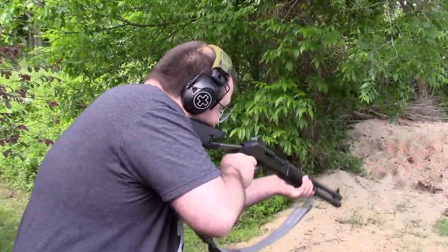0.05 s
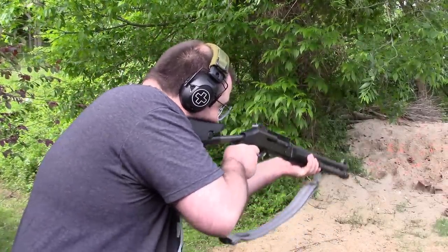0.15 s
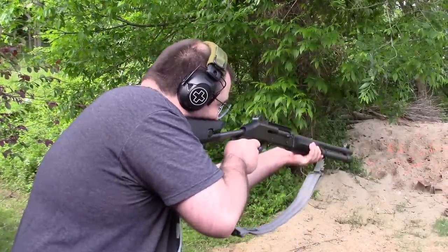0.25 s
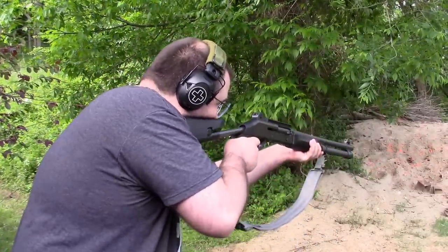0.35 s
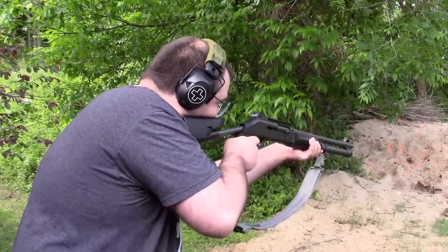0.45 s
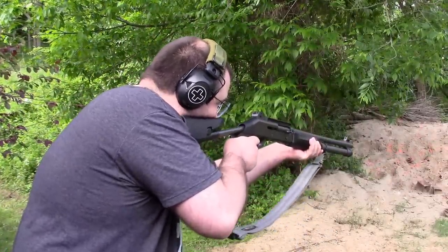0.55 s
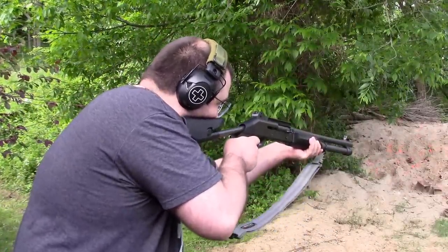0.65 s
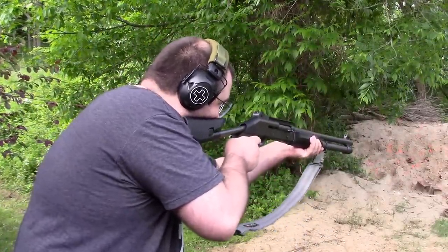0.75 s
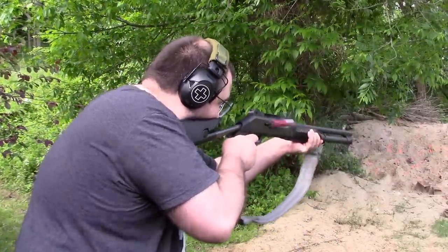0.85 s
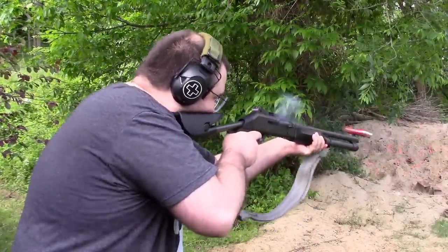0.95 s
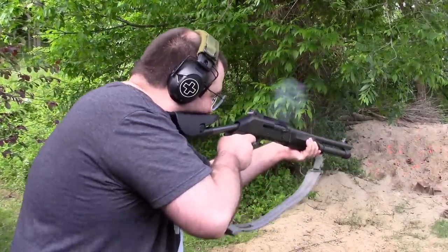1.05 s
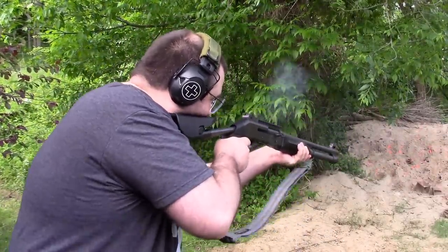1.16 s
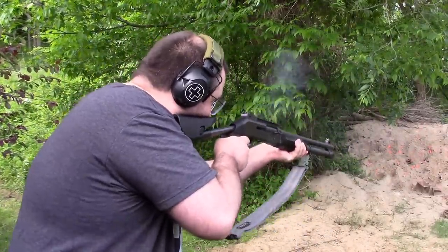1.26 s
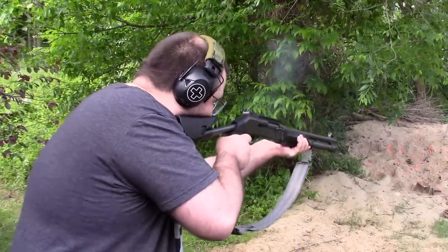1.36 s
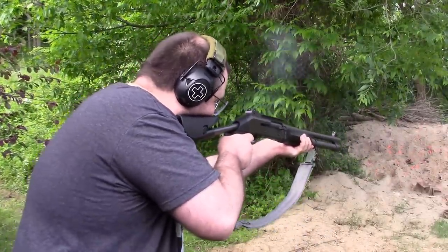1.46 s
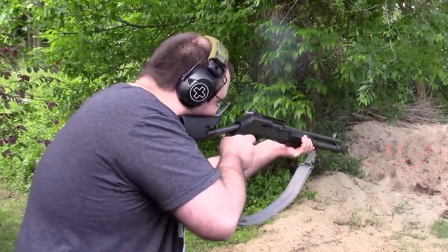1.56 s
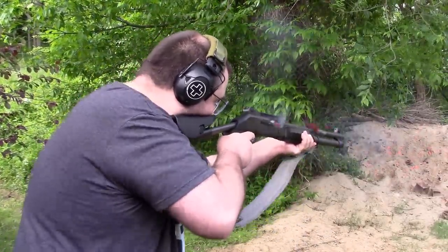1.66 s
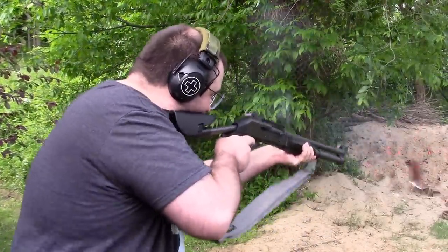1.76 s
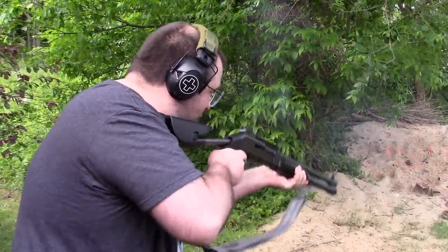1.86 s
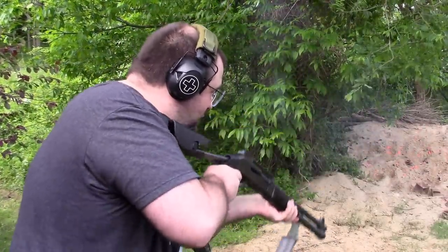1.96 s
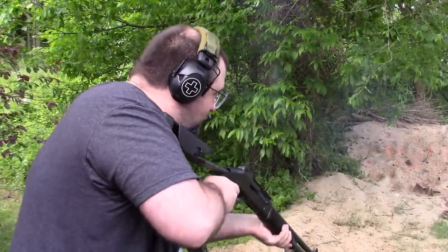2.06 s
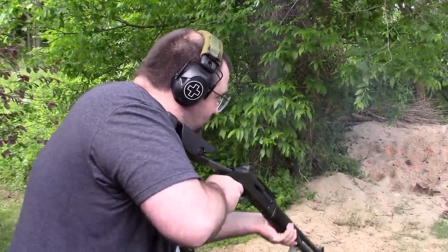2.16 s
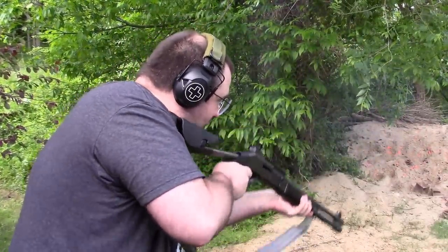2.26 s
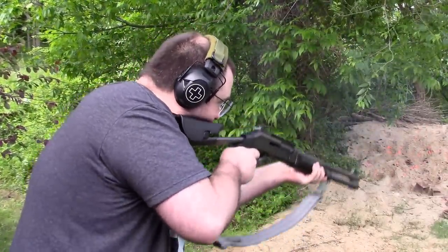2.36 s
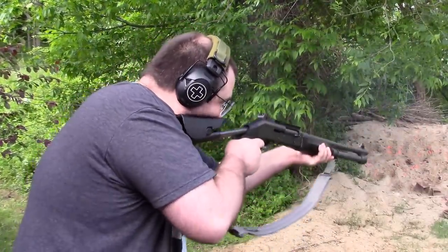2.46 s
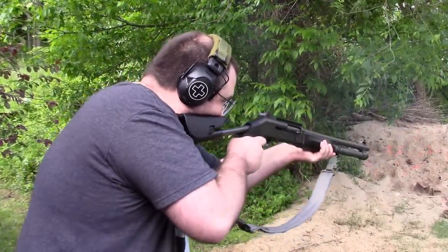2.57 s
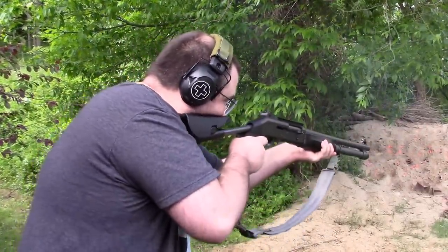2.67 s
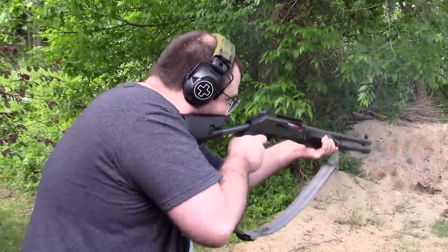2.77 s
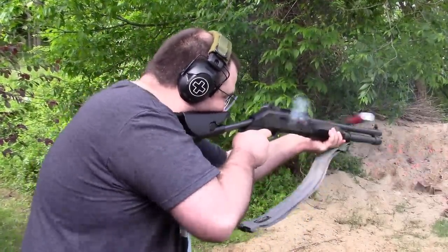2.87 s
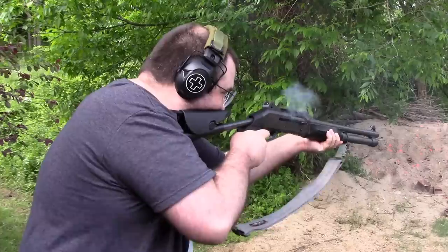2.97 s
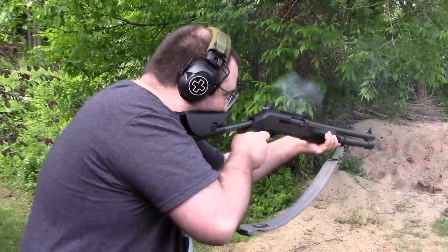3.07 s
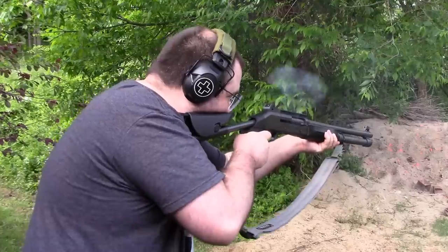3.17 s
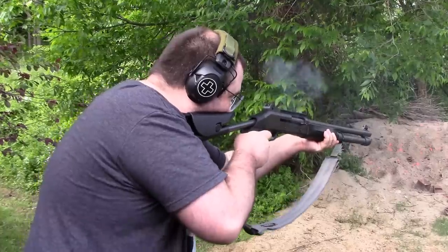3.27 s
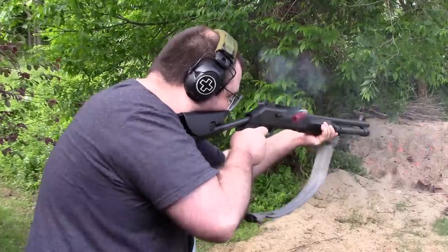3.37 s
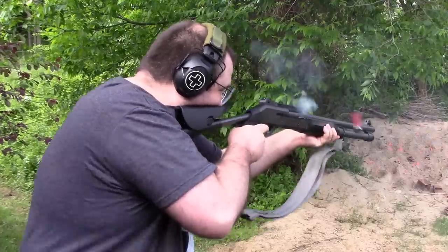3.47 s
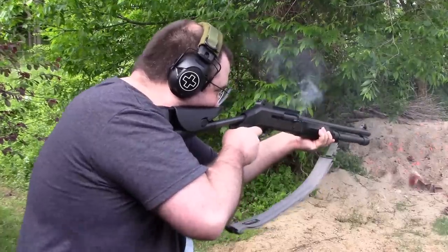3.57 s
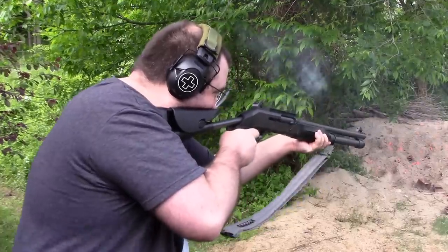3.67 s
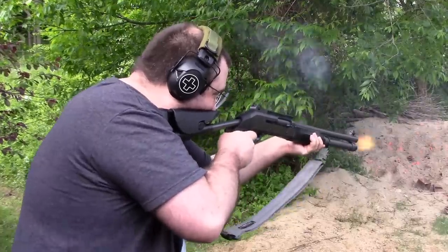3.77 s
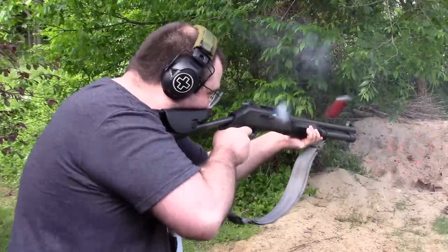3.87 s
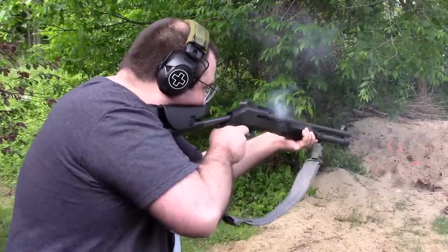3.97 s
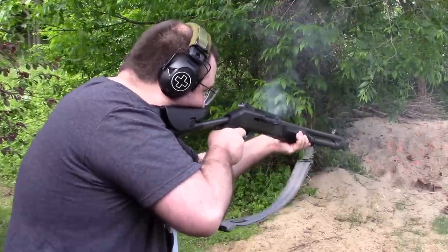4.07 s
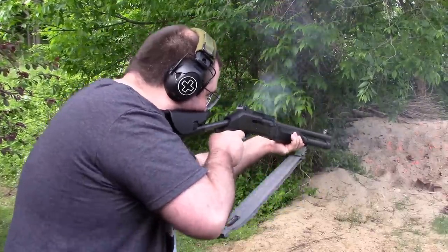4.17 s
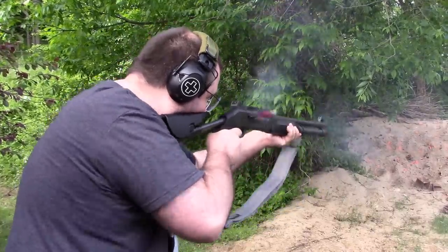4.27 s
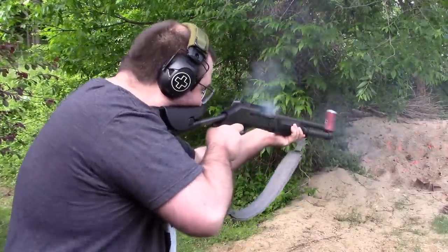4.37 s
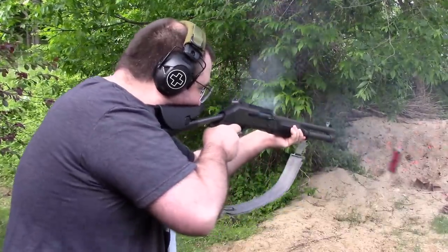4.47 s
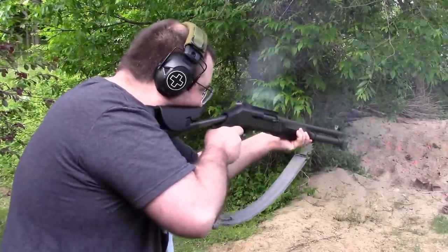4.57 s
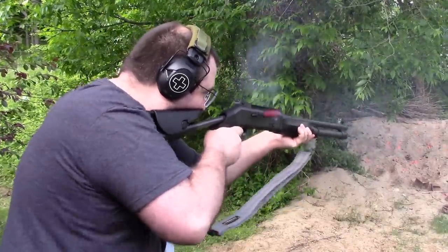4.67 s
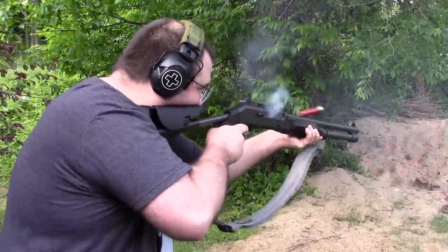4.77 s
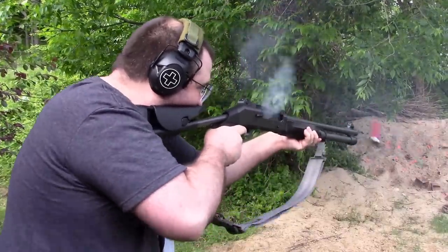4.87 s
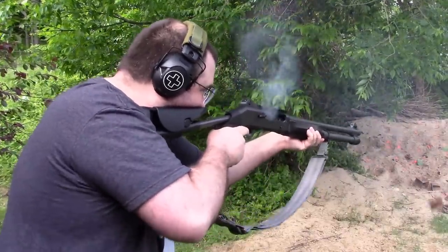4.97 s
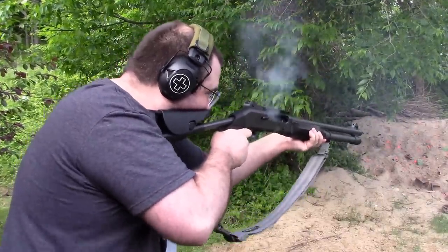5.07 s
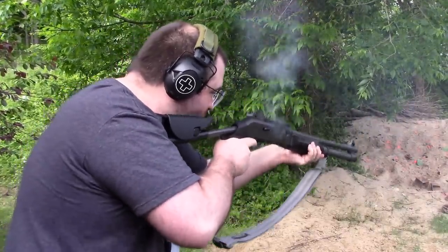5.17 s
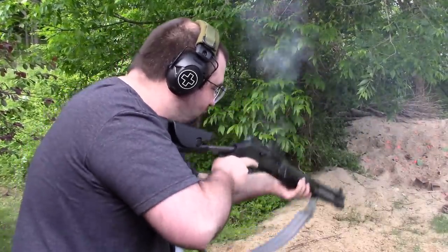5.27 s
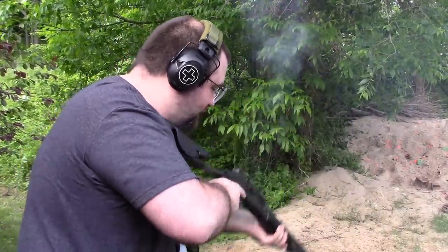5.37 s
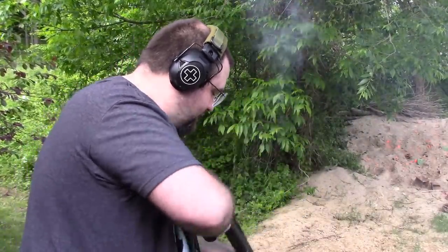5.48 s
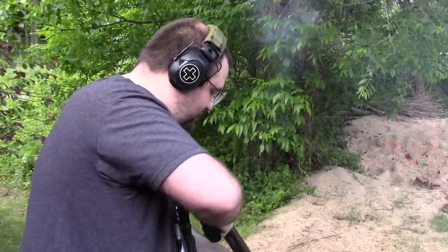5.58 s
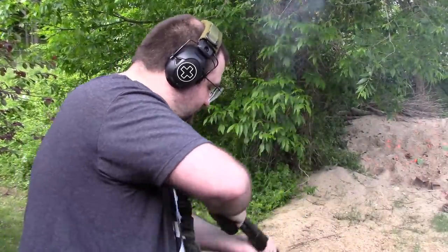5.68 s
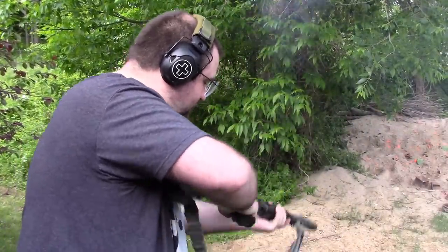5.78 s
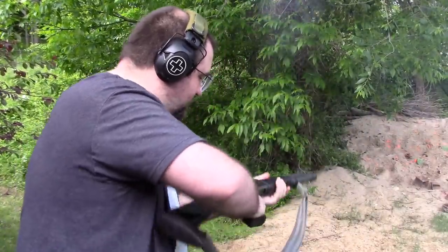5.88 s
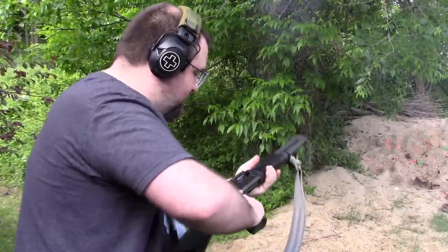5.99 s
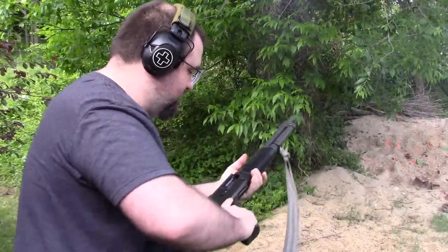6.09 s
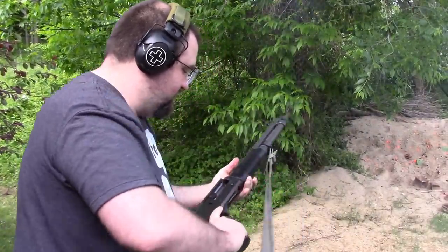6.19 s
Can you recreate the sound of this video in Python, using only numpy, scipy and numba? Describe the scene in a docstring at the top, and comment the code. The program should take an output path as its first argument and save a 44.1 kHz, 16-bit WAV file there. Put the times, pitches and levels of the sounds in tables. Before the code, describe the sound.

Cloth rustles faintly at the start, over a soft rush of outdoor air and the quiet hum of a far engine. A close semi-automatic shotgun fires at about 0.9 and 1.6 seconds, each shot a loud crack with a low boom. Five quicker shots follow at about 2.8, 3.4, 3.8, 4.3 and 4.7 seconds, a little quieter and increasingly thin in the bass. Bushes and trees return nearly the same echo each time, swelling as the volume ducks and creeps back. The steel bolt clacks shut just after every shot except the last. Empty plastic shells land with short ringing ticks, clearest at about 2.2 and 3.3 seconds, and more faintly around 5.4 seconds. Thrown-up sand patters softly after the blasts. The last echo rolls away through the far woods by about 6 seconds.

```python
"""Cloth rustles faintly over the hum of a far engine. Then a semi-automatic shotgun fires seven times
at an outdoor range: two single shots, then five in a quick string. Ground, bushes and trees send back
nearly the same echoes each time. The bolt slams shut, empty shells land and thrown-up sand sifts down.
An automatic volume control ducks at every shot and creeps back; the bass thins out in the quick string."""
import sys
import numpy as np
from scipy import signal
from scipy.fft import rfft, irfft, next_fast_len
from scipy.io import wavfile
from scipy.ndimage import uniform_filter1d, minimum_filter1d
from numba import njit

SR = 44100
rng = np.random.default_rng(int(sys.argv[2]) if len(sys.argv) > 2 else 0)


def unload_wav(signal):
    """Save mono or channel-first audio to the path in sys.argv[1] as 16-bit WAV at rate SR, clipped to [-1, 1]."""
    wavfile.write(
        sys.argv[1],
        SR,
        np.round(np.clip(np.atleast_2d(signal).T, -1, 1) * 32767).astype(np.int16),
    )


N = 274743
TAIL = 76800  # samples in one shot with its echoes
TIME = np.arange(N) / SR  # seconds since the scene began
AGE = TIME[:TAIL]  # seconds since one sound began

# The shots. Each row: start in seconds, level in dB, extra level for the crack in dB.
SHOTS = [(.867, 2, -4.5), (1.640, 1.5, -3.5), (2.817, -4, -3), (3.377, -5, 2.5), (3.838, -3.5, 1.5),
         (4.282, -7, 0), (4.705, -0.5, -1)]
# The bolt closing; after the last shot it stays open. Each row: start in seconds, level in dB.
BOLTS = [(0.9908, 3.5), (1.758, 2.5), (2.9448, -2), (3.504, -2), (3.962, 0), (4.4002, -6.5)]
# Empty shells landing. Each row: start in seconds, level in dB, fade in seconds, brightest pitch in Hz.
LANDINGS = [(1.312, -21, 0.018, 6000), (2.2348, 9.5, 0.0018, 2620), (3.333, 11, 0.0016, 6440),
            (4.242, -23, .002, 9000), (5.38, -18.5, 0.0016, 9970), (5.422, -23, 0.003, 6100)]
# The notes an empty shell rings with. Each row: pitch in Hz, width in Hz, level in dB.
SHELL_NOTES = [(1260, 110, 12), (2450, 550, 5), (2900, 450, 3), (4200, 600, 6.5), (5940, 550, -1),
               (6570, 550, -1), (9200, 2200, -12), (13500, 1500, -18)]
# Echoes off banks and trunks. Each row: delay in seconds, pitch in Hz, width in Hz, level in dB.
ECHOES = [(.198, 714, 600, 1), (.3705, 900, 666, 8), (.371, 160, 121, -4), (.3976, 880, 415, 2.5),
          (.5396, 578, 260, -4), (.424, 465, 140, 2), (.4397, 464, 202, -2), (.456, 420, 220, -5)]
# Low swells from a stand of trees and a far ridge.
# Each row: delay in seconds, half length in seconds, pitch in Hz, level in dB.
SWELLS = [(0.222, 0.041, 390, -5), (0.937, .11, 690, -35.5)]
# Leaves and air soak up sound, treble most. Each row: frequency in Hz, loss in dB per second.
ABSORPTION = [(100, 23), (400, 3), (1200, 10), (2500, 18), (5000, 45), (9000, 82.5), (16000, 148)]
# Cloth rubbing. Each row: time of full strength in seconds, hold in seconds, level in dB.
RUBS = [(0.048, .22, -55), (0.802, .07, -61.5)]
# The engine's speed. Each row: time in seconds, firings per second.
ENGINE_SPEED = [(0, 84), (.35, 91), (.6, 90.5), (6.23, 89)]
# The engine's tones. Each row: multiple of the firing rate, level in dB.
ENGINE_TONES = [(1, -54.5), (2, -59), (3, -61.5), (4, -68), (5, -62.5), (6, -67)]

# The tone colour of each noise. Each row: frequency in Hz, relative level in dB.
BLAST_COLOUR = [(40, -22), (75, -28), (105, -7.5), (200, -2), (300, 0.5), (420, 1.5), (600, 0), (760, -.5),
                (1150, 1), (1650, -4), (2500, -3), (5000, -4.5), (9000, -6.5), (16000, -21)]
CRACK_COLOUR = [(100, -22), (500, -7), (2000, -2), (4500, 0), (9000, -1), (12000, -9), (16000, -13)]
BOOM_COLOUR = [(30, -53), (80, -14.5), (170, -13.5), (290, 3.5), (520, 0.5), (800, -4.5), (1500, -10.5),
               (4000, -22.5), (16000, -67)]
ROLL_COLOUR = [(40, -66), (100, -4), (220, -6.5), (430, 2), (800, -6.5), (1250, -6), (1800, -16.5),
               (3500, -22.5), (8000, -39)]
STEEL_COLOUR = [(300, -6.5), (1500, 2), (3800, 5), (6000, 8), (9000, 6.5), (12000, -0.5), (16000, -13)]
SAND_COLOUR = [(500, 2), (2000, 8.5), (4000, 1), (6500, 5), (10000, 1.5), (12500, -6.5), (16000, -24)]
CLOTH_COLOUR = [(200, -8), (700, 3.5), (1500, -4), (2600, -1.5), (4500, -14.5), (9000, -17), (15000, -30)]
AIR_COLOUR = [(15, -63), (25, -33), (57, -16), (90, -23.5), (131, -2), (172, -2), (309, -1.5), (438, -7),
              (588, -9), (729, -9.5), (15000, -39)]
# Stereo width; the open air is wider than the gun. "Mid" is what both channels share, "side" the rest.
# Each row: frequency in Hz, side level compared with mid in dB.
GUN_WIDTH = [(100, -73), (300, -35), (1000, -20.5), (4000, -13.5), (12000, -12.5)]
AIR_WIDTH = [(100, -22), (500, -9), (2000, -10), (10000, -9)]
# The wind filter's climb. Each row: time in seconds, frequency in Hz below which sound is cut.
LOW_CUT = [(2.8, 25), (3.15, 131), (4.33, 165), (4.75, 1290)]


def blast(reflections, crack_db):
    """One shot: a crack and a boom, then the answers from near and far."""
    whole = crack(crack_db) + boom(reflections) + far_woods(reflections)
    whole = whole + foliage(reflections) + tree_swells(reflections)
    fade_out = np.minimum((AGE[-1] - AGE) / .31, 1)
    return whole * fade_out


def crack(db):
    """The muzzle gives a few milliseconds of bright noise."""
    shape = burst(start=0, hold=.0058, fade=.0019)
    return undb(db + 14) * shape * colour(noise(TAIL, side_db=-9), CRACK_COLOUR)


def boom(reflections):
    """The low body of the blast, off the ground; at first it pushes unequally on the two microphones."""
    gust = undb(-5) * burst(start=0, hold=0, fade=.016) * rng.standard_normal(TAIL)
    uneven = gust * np.array([[1], [-1]])
    rise = np.clip((AGE - .002) / .005, 0, 1)
    shape = rise * burst(start=0, hold=.018, fade=.048)
    return undb(5) * shape * colour(reflections[:, ::-1] + uneven, BOOM_COLOUR)


def foliage(reflections):
    """Countless tiny echoes, duller the later they come: the ground answers at once, bushes build up."""
    spectrum = rfft(colour(reflections, BLAST_COLOUR))
    centres_hz = np.geomspace(125, 16000, 12)
    band_position = np.interp(np.log(bins(reflections) + 1), np.log(centres_hz), np.arange(12))
    scatter = 0
    for k, hz in enumerate(centres_hz):
        band = irfft(spectrum * np.maximum(1 - abs(band_position - k), 0), TAIL)
        scatter = scatter + band * undb(-at_pitch(ABSORPTION, hz) * AGE)
    ground = undb(1.5) * swell(AGE, full=0, hold=.022, rise=0, fall=333)
    bushes = undb(1.58) * swell(AGE, full=.12, hold=.21, rise=57, fall=52)
    return scatter * np.hypot(ground, bushes)


def clumps(per_second, spread_db):
    """Bushes stand in clumps, so their echoes come in uneven bunches."""
    times = np.arange(0, AGE[-1] + 1, 1 / per_second)
    gain = undb(spread_db * np.interp(AGE, times, rng.standard_normal(len(times))))
    return gain / rms(gain)


def hard_echoes():
    """Each bank or trunk sends back a short thud, a little from one side."""
    out = np.zeros((2, TAIL))
    for delay, hz, width_hz, db in ECHOES:
        since = np.maximum(AGE - delay, 0)
        growth = np.minimum(np.pi * width_hz * since, 60)
        thud = growth * np.exp(1 - growth) * np.sin(2 * np.pi * hz * since)
        pan = 1 + .032 * rng.standard_normal() * np.array([[1], [-1]])
        out += pan * undb(db) * thud
    return signal.sosfilt(signal.butter(2, 100, "high", fs=SR, output="sos"), out)


def tree_swells(reflections):
    """A stand of trees and a far ridge return the low part of the blast, smeared by their depth."""
    out = 0
    for delay, half_length, hz, db in SWELLS:
        body = resonance(resonance(reflections, hz, width_hz=hz), hz, width_hz=hz)[:, ::-1]
        hump = np.exp(-((AGE - delay) / half_length) ** 2)
        out = out + undb(db) * hump * body / np.std(body)
    return out


def far_woods(reflections):
    """Far woods send back a roll that swells late and dies slowly."""
    shape = swell(AGE, full=.52, hold=.5, rise=48, fall=8)
    return undb(-34.5) * shape * colour(reflections[:, ::-1], ROLL_COLOUR)


def hammer():
    """The hammer snaps forward and the gun's steel parts rattle just before the blast."""
    snap = burst(start=0, hold=.001, fade=.001)
    rattle = undb(-1) * burst(start=0, hold=.006, fade=.002)
    return undb(-17) * (snap + rattle) * colour(noise(TAIL, side_db=-9), STEEL_COLOUR)


def bolt():
    """The bolt slams shut on the next shell and locks, in two clacks; the steel rings briefly."""
    slam = burst(start=0, hold=.001, fade=.0018)
    lock = undb(-3) * burst(start=.006, hold=.002, fade=.006)
    ring = undb(-17.5) * burst(start=0, hold=0, fade=.034) * np.sin(2 * np.pi * 8800 * AGE)
    return (slam + lock) * colour(noise(TAIL, side_db=-9), STEEL_COLOUR) + ring


def empty_shell(fade, bright_hz):
    """A plastic shell with a metal end ticks and rings as it lands; the bushes answer faintly."""
    tick = burst(start=0, hold=.00032, fade=fade)
    answer = undb(-29) * burst(start=.008, hold=.018, fade=.02)
    contact = resonance(noise(TAIL) * (tick + answer), bright_hz, width_hz=.87 * bright_hz)
    ring = sum(undb(db) * resonance(contact, hz, width_hz) for hz, width_hz, db in SHELL_NOTES)
    return ring + undb(-22) * contact


def sand():
    """Every shot throws up sand and leaf bits that patter down; the showers overlap."""
    showers = [swell(TIME - s, full=.24, hold=.78, rise=60, fall=12) * (TIME > s) for s, *_ in SHOTS]
    grains = undb(2.4 * rng.exponential(size=N))
    patter = colour(noise(N) * grains / rms(grains), SAND_COLOUR)
    return undb(-45.5) * np.linalg.norm(showers, axis=0) * patter


def cloth():
    """Shirt and sling rub as the gun is raised and then pulled in."""
    rubbing = sum(undb(db) * swell(TIME, full, hold, rise=60, fall=67) for full, hold, db in RUBS)
    return rubbing * colour(noise(N), CLOTH_COLOUR)


def engine():
    """A far engine hums at its firing rate and at multiples of it."""
    firings = np.cumsum(curve(ENGINE_SPEED, TIME)) / SR
    return sum(np.sqrt(2) * undb(db) * np.sin(2 * np.pi * (multiple * firings + rng.random()))
               for multiple, db in ENGINE_TONES)


def air():
    """Still air makes a soft, wide, low rush."""
    return undb(-54) * colour(noise(N, AIR_WIDTH), AIR_COLOUR)


def undb(db):
    """Turn decibels into a number to multiply by."""
    return 10 ** (np.asarray(db) / 20)


def rms(x):
    """The average strength of a signal."""
    return np.sqrt(np.mean(x ** 2))


def curve(table, t):
    """Join a table's points with straight lines in time."""
    return np.interp(t, *np.transpose(table))


def at_pitch(table, hz):
    """Read a table by frequency, giving each octave equal room."""
    table_hz, value = np.transpose(table)
    return np.interp(np.log(np.maximum(hz, 1)), np.log(table_hz), value)


def bins(x):
    """The frequencies in the spectrum of x, in Hz."""
    return np.fft.rfftfreq(x.shape[-1], 1 / SR)


def colour(x, table):
    """Give white noise a tone colour and keep its power."""
    gain = undb(at_pitch(table, bins(x)))
    return irfft(rfft(x) * gain / rms(gain), x.shape[-1])


def noise(size, width=GUN_WIDTH, side_db=0):
    """White noise as two close microphones get it: almost the same in both."""
    length = next_fast_len(size, True)
    mid, side = rng.standard_normal((2, length))
    side = irfft(rfft(side) * undb(at_pitch(width, bins(side)) + side_db), length)
    return np.array([mid + side, mid - side])[:, :size]


def burst(start, hold, fade):
    """A level that jumps up, holds and dies away; all times are in seconds."""
    return (AGE >= start) * np.exp(-np.clip((AGE - start - hold) / fade, 0, 60))


def swell(t, full, hold, rise, fall):
    """A level that rises, holds and falls; full and hold are in seconds, rise and fall in dB per second."""
    return undb(-rise * np.maximum(full - t, 0) - fall * np.maximum(t - full - hold, 0))


def resonance(x, hz, width_hz):
    """Let through a band around one pitch."""
    return signal.lfilter(*signal.iirpeak(hz, hz / min(width_hz, SR / 3), fs=SR), x)


def add(out, sound, start):
    """Mix a sound in at a start time in seconds."""
    i = int(start * SR)
    out[:, i:i + sound.shape[-1]] += sound[..., :N - i]


@njit
def low_cut(x, hz):
    """Gently remove what lies below a moving frequency."""
    y, low = np.empty(len(x)), 0.
    for i in range(len(x)):
        g = np.tan(np.pi * hz[i] / SR)
        step = (x[i] - low) * g / (1 + g)
        y[i] = x[i] - low - step
        low += 2 * step
    return y


@njit
def follow(x, release_s):
    """Follow the peaks: jump up at once, fall back gradually."""
    y, peak, keep = np.empty(len(x)), 0., np.exp(-1 / (release_s * SR))
    for i in range(len(x)):
        peak = max(x[i], peak * keep)
        y[i] = peak
    return y


def wind_filter(x):
    """A moving bass cut; the higher it climbs, the more the remaining bass moves to the centre."""
    cut_hz = curve(LOW_CUT, TIME)
    mid = low_cut((x[0] + x[1]) / 2, cut_hz)
    side = low_cut((x[0] - x[1]) / 2, cut_hz)
    side = low_cut(low_cut(side, 2.3 * cut_hz), 2.3 * cut_hz)
    return signal.sosfilt(signal.butter(3, 50, "high", fs=SR, output="sos"), [mid + side, mid - side])


def volume_control(x, top_db, release_s):
    """A blast pulls the volume down; it creeps back, so the echoes swell and older tails are ducked."""
    step = 1 / (.02 * SR)  # averages over 20 ms
    loudness = np.sqrt(signal.lfilter([step], [1, step - 1], np.mean(x ** 2, axis=0)))
    gain = np.minimum(undb(top_db) / (follow(loudness, release_s) + 1e-9), 1)
    return x * np.interp(TIME - .003, TIME, gain)  # acts 3 ms late


def limiter(x, release_s):
    """Hold each channel's peaks within full scale."""
    gain = 1 / np.maximum([follow(abs(channel), release_s) for channel in x], 1)
    return x * uniform_filter1d(minimum_filter1d(gain, size=45), size=45)


def level_drop(start_s, takes_s, back_s, db, dip_db):
    """The level sinks early in the quick string, dips briefly deeper, and returns after the last shot."""
    since = TIME - start_s
    dip = dip_db * np.clip(1 - (since - takes_s) / .3, 0, 1)
    sunk = np.clip(since / takes_s, 0, 1)
    recovered = np.clip((TIME - back_s) / .44, 0, 1)
    return undb((sunk - recovered) * (db + dip))


def scene():
    """Mix all sources. The trees stand still, so each shot gets nearly the same pattern of echoes."""
    out = engine() + air() + cloth() + sand()
    trees = noise(TAIL) * clumps(per_second=90, spread_db=1)
    echoes = hard_echoes()
    fresh = .2  # share of the pattern's power that is new with each shot
    for start, db, crack_db in SHOTS:
        reflections = np.sqrt(1 - fresh) * trees + np.sqrt(fresh) * noise(TAIL)
        add(out, hammer(), start - .0064)
        add(out, undb(db) * (blast(reflections, crack_db) + echoes), start)
    for start, db in BOLTS:
        add(out, undb(db) * bolt(), start)
    for start, db, fade, bright_hz in LANDINGS:
        add(out, undb(db) * empty_shell(fade, bright_hz), start)
    return out


def record(dry):
    """Thin the bass, tame the blasts, lower the quick string and cut the treble above 15800 Hz."""
    ducked = volume_control(wind_filter(dry), top_db=-7.5, release_s=.31)
    held = limiter(ducked, release_s=.0023)
    lowered = held * level_drop(start_s=3.02, takes_s=.063, back_s=5.47, db=-3, dip_db=-4)
    return signal.sosfilt(signal.ellip(10, .2, 70, 15800, fs=SR, output="sos"), lowered)


dry = scene()
out = record(dry)
unload_wav(out)
```